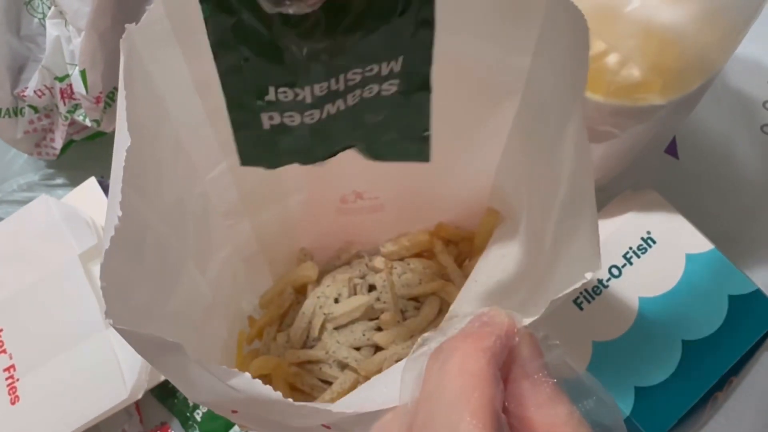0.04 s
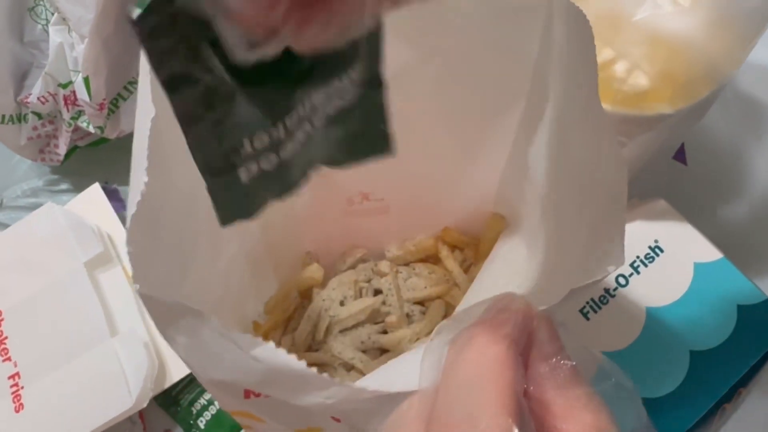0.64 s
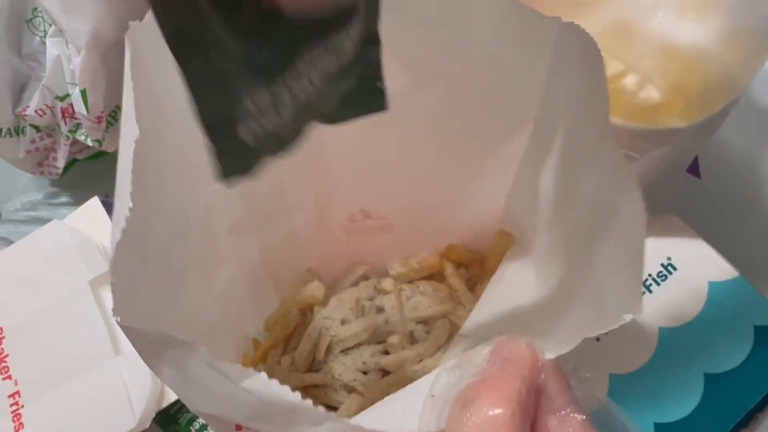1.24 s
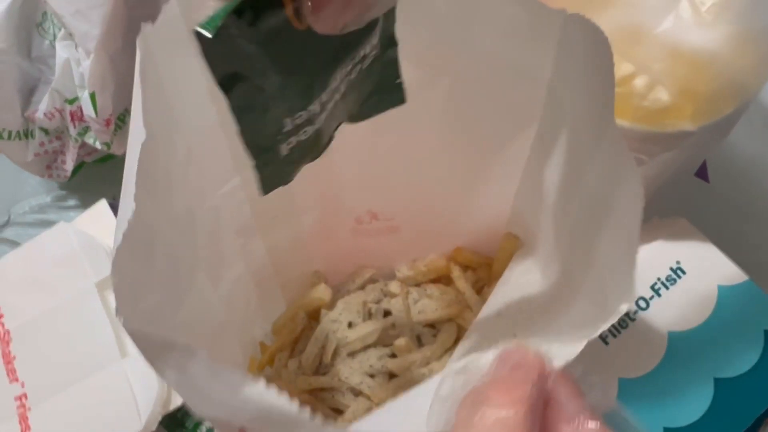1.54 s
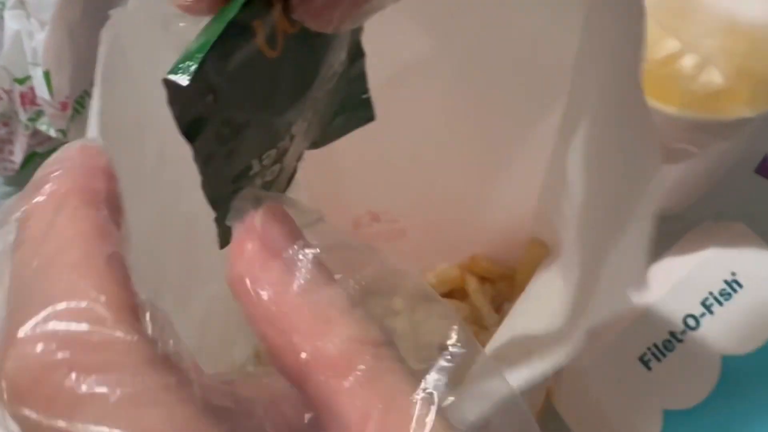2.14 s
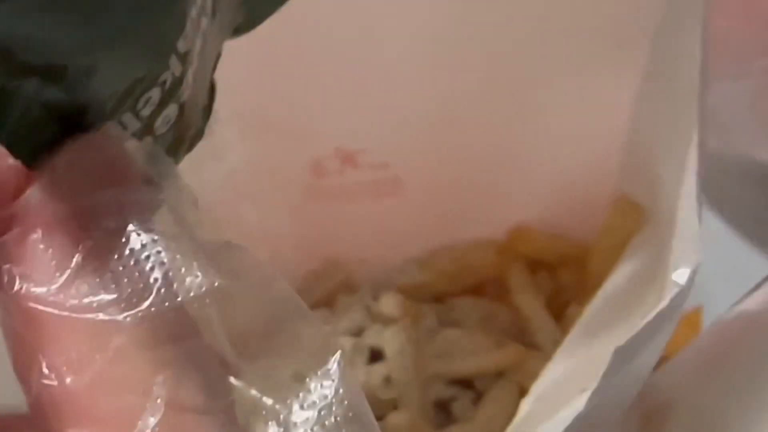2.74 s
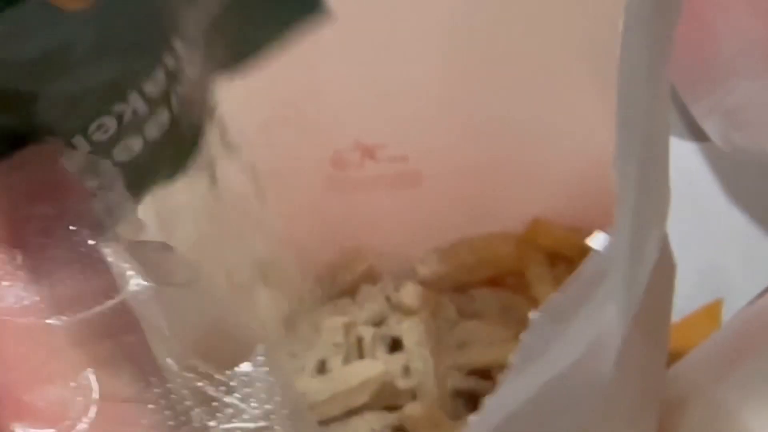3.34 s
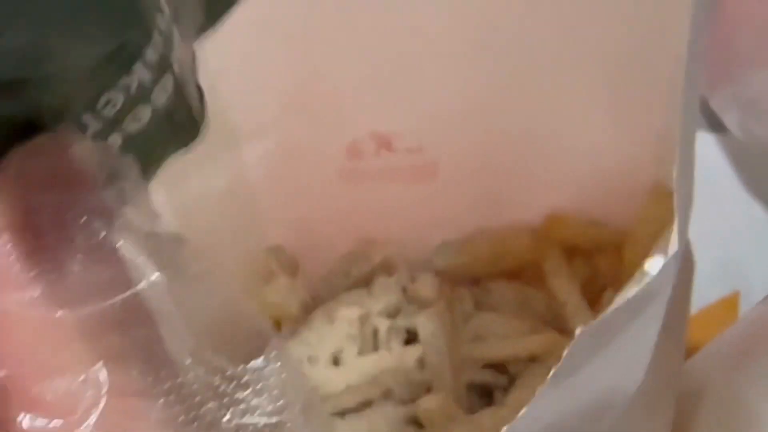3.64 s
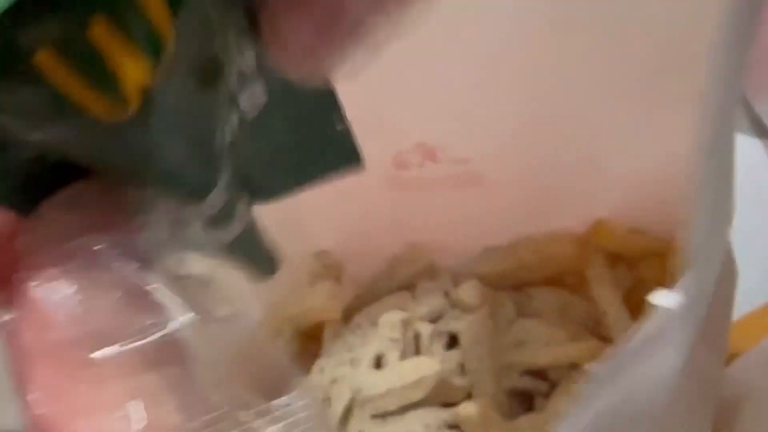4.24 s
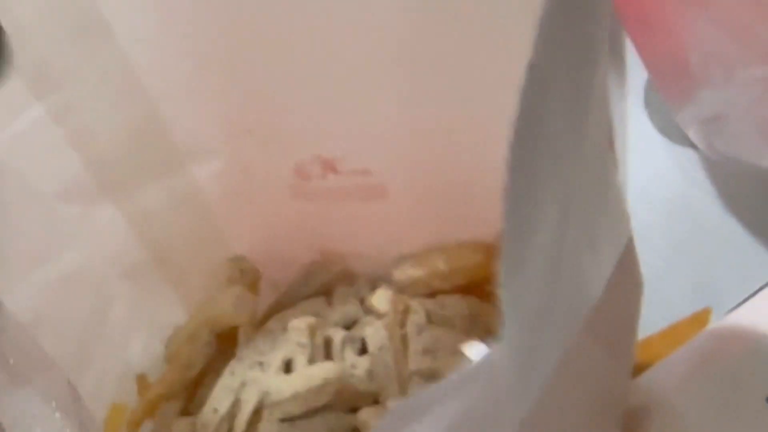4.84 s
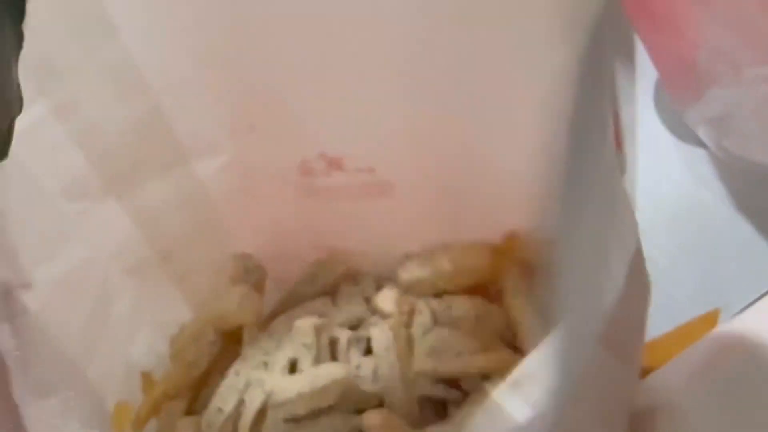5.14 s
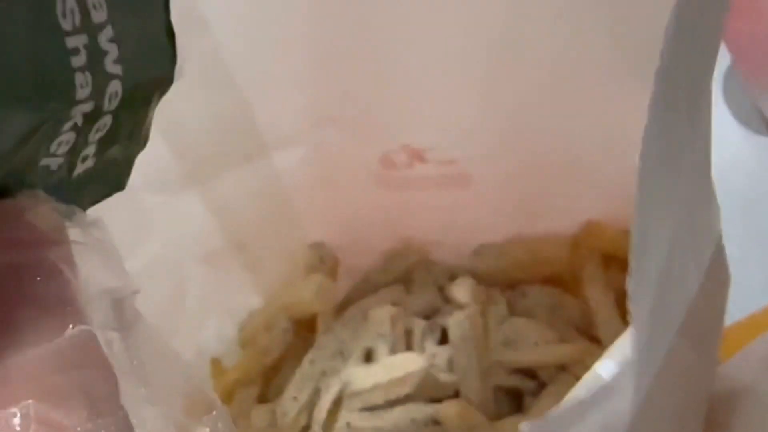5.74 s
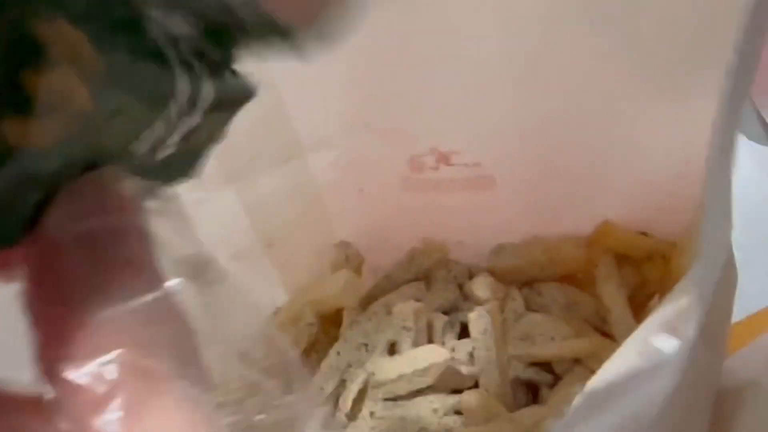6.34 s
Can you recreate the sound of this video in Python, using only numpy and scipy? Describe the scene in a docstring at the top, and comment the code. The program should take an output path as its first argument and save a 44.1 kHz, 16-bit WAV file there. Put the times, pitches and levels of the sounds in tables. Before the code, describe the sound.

A foil seasoning packet is shaken over a paper bag with a soft powdery hiss, then squeezed with sharp, dense crinkling.

```python
"""A small quiet room; a two-port microphone a hand's width from an open paper bag of fries. A foil seasoning
sachet is shaken over the bag: powder sifts down in a fine bright hiss and clumps tick on the paper. Then gloved
fingers grip and squeeze the sachet; its creases snap and tones ring with them. The held bag flexes throughout,
with soft thumps and a low rumble."""
import sys
import numpy as np
from scipy import signal
from scipy.fft import rfft, irfft
from scipy.io import wavfile
from scipy.ndimage import uniform_filter1d

SR = 44100
rng = np.random.default_rng(int(sys.argv[2]) if len(sys.argv) > 2 else 0)


def waveform_to_disk(signal):
    """Save audio, clipped to [-1, 1], as 16-bit WAV at the path in sys.argv[1]."""
    frames = np.transpose(np.atleast_2d(signal))
    scaled = np.clip(frames, -1, 1) * 32767
    samples = np.round(scaled).astype(np.int16)
    wavfile.write(sys.argv[1], SR, samples)


N = 289994
TIME = np.arange(N) / SR
LEAD = 96  # samples in which a crease starts to give before it cracks

# spectrum of crackling foil: f/Hz, level/dB
FOIL_SPECTRUM = [(300, 5), (600, -6), (1000, -6), (1500, -10.5), (2200, -7), (2900, -2), (3450, -1),
                 (3750, -7), (6000, -3), (7700, 0), (9000, -6.5), (10300, -5.5), (12500, -12),
                 (15500, -8.5)]
# shakes that let powder slide out: t/s, length/s, hiss/dB, foil swishing in the fingers/dB
SHAKES = [(0.0, 0.24, -44, -53), (0.13, 0.2, -45.5, -62), (0.34, 0.11, -49.5, -50.5),
          (0.52, 0.16, -54, -56), (0.828, 0.013, -37, -50), (0.93, 0.085, -49, -56),
          (1.09, 0.025, -47.5, -55), (1.23, 0.086, -47.5, -55), (1.44, 0.1, -52.5, -54.5),
          (1.58, 0.14, -41.5, -54), (1.8, 0.098, -40.5, -48), (1.93, 0.15, -46, -47), (2.06, 0.2, -49, -54),
          (2.23, 0.21, -55.5, -50.5), (2.53, 0.035, -50, -44), (2.71, 0.038, -48, -42),
          (2.88, 0.16, -55, -54)]
SHAKE_ATTACK_S, SHAKE_RELEASE_S = 0.018, 0.086
# fingers squeezing the sachet: t/s, length/s, creasing/dB, rubbing/dB
SQUEEZES = [(3.02, 0.12, -30, -59), (3.176, 0.12, -31.5, -46), (3.335, 0.19, -53, -51),
            (3.6, 0.049, -47, -48), (3.711, 0.32, -47, -49), (4.051, 0.21, -28.5, -43.5),
            (4.313, 0.068, -36, -41), (4.41, 0.075, -39, -44), (4.7, 0.027, -35, -68),
            (4.773, 0.12, -35.5, -52.5), (4.944, 0.021, -36, -48), (5.03, 0.088, -30, -50.5),
            (5.114, 0.055, -31, -57), (5.274, 0.03, -29, -42), (5.338, 0.03, -28, -54),
            (5.43, 0.027, -41, -45.5), (5.505, 0.026, -26, -45), (5.923, 0.47, -37.5, -47),
            (6.421, 0.12, -29, -39)]
SQUEEZE_ATTACK_S, SQUEEZE_RELEASE_S = 0.0031, 0.0067


def undb(db):
    """Decibels to gain."""
    return 10 ** (np.asarray(db) / 20)


def unit(x):
    """Scale to rms 1."""
    return x / np.sqrt(np.mean(x ** 2) + 1e-20)


def across(points, hz):
    """Read (f/Hz, value) points on a log-frequency axis."""
    f, value = np.transpose(points)
    return np.interp(np.log(hz + 1), np.log(f), value)


def colour(x, spectrum):
    """Causal filter with the given (f/Hz, level/dB) spectrum, from the folded cepstrum."""
    n = x.shape[-1]
    gain = undb(across(spectrum, np.fft.rfftfreq(n, 1 / SR)))
    cepstrum = irfft(np.log(gain), n)
    cepstrum[1:n // 2] *= 2
    cepstrum[n // 2 + 1:] = 0
    return irfft(rfft(x) * np.exp(rfft(cepstrum)), n)


def band(x, lo_hz, hi_hz):
    """Band-pass."""
    return signal.sosfilt(signal.butter(3, [lo_hz, hi_hz], "band", fs=SR, output="sos"), x)


def resonate(x, hz, width_hz):
    """One ringing mode."""
    return signal.lfilter(*signal.iirpeak(hz, hz / width_hz, fs=SR), x)


def smooth(power, samples):
    """Average a power twice over a sliding window."""
    return np.abs(uniform_filter1d(uniform_filter1d(power, samples), samples))


def wander(per_s):
    """Glide between random values, per_s of them a second; rms 1."""
    hold = int(SR / per_s)
    steps = np.repeat(rng.standard_normal(N // hold + 1), hold)
    return unit(uniform_filter1d(steps, hold)[:N])


def add(track, start_s, sound):
    """Mix a sound into the track."""
    i = max(int(start_s * SR), 0)
    n = max(min(sound.shape[-1], N - i), 0)
    track[..., i:i + n] += sound[..., :n]


def spread(mid, side, side_db):
    """Left and right from mid and side."""
    return mid + undb(side_db) * np.array([side, -side])


def gestures(rows, attack_s, release_s, column=2):
    """Gain over time of movements (t/s, length/s, level/dB, ...): each swells, holds and dies away."""
    t = TIME[::32]
    power = 0
    for start, length, db in np.array(rows)[:, [0, 1, column]]:
        before, after = np.maximum(start - t, 0), np.maximum(t - start - length, 0)
        power += undb(db) ** 2 * np.exp(-2 * (before / attack_s + after / release_s))
    return np.interp(TIME, t, np.sqrt(power))


def patter(per_s, scatter_db, decay_ms):
    """Tiny random impacts of uneven size, as bursts in two noises; loudness evened out over 40 ms."""
    hits = rng.random(N) < per_s / SR
    energy = hits * undb(scatter_db * np.minimum(rng.standard_normal(N), 2.6)) ** 2
    power = signal.lfilter([1], [1, -np.exp(-2e3 / (decay_ms * SR))], energy)
    return np.sqrt(power / (smooth(power, SR // 25) + 1e-9)) * rng.standard_normal((2, N))


def powder(grip, pour_db=3, kneaded_db=-14, trickle_db=-65, flicker_db=2, clump_db=-8, clump_s=0.0021):
    """Fine dust scrapes down the foil in a hiss; coarser granules and clumps tick on the paper."""
    # spectrum of falling grains: f/Hz, level/dB
    grain_spectrum = [(1000, -8.5), (3000, -14.5), (5200, -10), (6300, -10), (7500, -2.5), (9000, 0),
                      (10700, -1.5), (12200, -6.5), (15500, -1)]
    # clumps of seasoning striking the paper: t/s, level/dB
    clumps = [(0.1426, -28), (0.16, -33), (0.8235, -33), (0.8834, -40), (0.9, -37), (0.9314, -29.5),
              (0.9936, -30.5), (1.0903, -28.5), (1.229, -42), (1.305, -31), (1.6673, -34), (1.7027, -29),
              (1.799, -36), (1.8248, -27), (1.8862, -26), (1.9062, -26), (1.914, -29), (2.014, -25),
              (2.5447, -24.5)]
    dust = patter(per_s=3800, scatter_db=4.5, decay_ms=0.78)
    granules = patter(per_s=260, scatter_db=27, decay_ms=0.71)
    mid, side = unit(colour(dust + undb(-2) * granules, grain_spectrum))
    # the paper walls scatter the lower part of the hiss; the top arrives straight
    side = colour(side, [(5000, -4.5), (9000, -9.5), (12000, -20)])
    pour = gestures(SHAKES, SHAKE_ATTACK_S, SHAKE_RELEASE_S)
    flow = undb(pour_db) * pour + undb(kneaded_db) * grip + undb(trickle_db)
    out = spread(mid, side, side_db=0.5) * flow * undb(flicker_db * wander(per_s=60))
    t = TIME[:512]
    for start, db in clumps:
        tick = rng.standard_normal(len(t)) * np.exp(-t / clump_s)
        add(out, start, undb(db + clump_db) * unit(colour(tick, grain_spectrum)))
    return out


def glove(grip, rub_db=-3, grip_rub_db=-15, crinkle_db=-15, swish_db=-5, slip_db=4):
    """Thin plastic swishes on the foil with each shake; under the fingers' grip it rubs and creases."""
    # spectrum of the glove sliding on foil: f/Hz, level/dB
    slide_spectrum = [(300, 4), (600, -4), (1000, 9), (1600, 3.5), (2300, 7.5), (3100, 8), (4500, 5.5),
                      (6000, 1.5), (7700, 2), (10000, -39.5), (15000, 2)]
    slide = unit(colour(patter(per_s=1800, scatter_db=11.5, decay_ms=2.7)[0], slide_spectrum))
    folds = colour(patter(per_s=170, scatter_db=14, decay_ms=0.81)[0], FOIL_SPECTRUM)
    creases = unit(resonances(folds, direct_db=-3))
    sheen = unit(colour(patter(per_s=2800, scatter_db=5.5, decay_ms=1.0)[0], FOIL_SPECTRUM))
    squeeze = gestures(SQUEEZES, SQUEEZE_ATTACK_S, SQUEEZE_RELEASE_S)
    rub = gestures(SQUEEZES, SQUEEZE_ATTACK_S, SQUEEZE_RELEASE_S, column=3)
    shake = gestures(SHAKES, SHAKE_ATTACK_S, SHAKE_RELEASE_S, column=3)
    rubbing = slide * (undb(rub_db) * rub + undb(grip_rub_db) * grip)
    creasing = undb(crinkle_db) * creases * np.hypot(squeeze, grip)
    swishing = undb(swish_db) * (slide + undb(-4) * sheen) * shake
    catch_and_slip = undb(slip_db * wander(per_s=40))
    return (rubbing + creasing) * catch_and_slip + swishing


def bag(sway_db=-2, sway_swell_db=-10, flutter_db=-9, flutter_swell_db=-13, thump_db=-16, slap_db=-11):
    """The limp paper walls pump air at the microphone, and now and then flip with a thump."""
    # the bag swaying in the hand: t/s, level/dB
    sway_levels = [(0.0, -38), (0.03, -37), (0.66, -41), (0.69, -32.5), (1.28, -43.5), (1.85, -38.5),
                   (1.98, -32), (2.05, -44), (2.29, -39.5), (2.34, -29), (2.47, -57), (2.53, -30),
                   (2.65, -56.5), (2.78, -32), (2.91, -47), (3.44, -35.5), (3.5, -44.5), (3.57, -28),
                   (3.7, -37.5), (4.89, -41), (5.0, -56), (5.07, -36), (6.01, -43), (6.58, -36)]
    # a wall flexing: t/s, level/dB, slap relative to that level/dB
    flexes = [(0.336, -32, -8.5), (0.488, -29, -13.5), (0.689, -31.5, -13), (0.74, -29, -11),
              (0.86, -24, -13), (0.915, -27.5, -8), (0.96, -24, -16), (1.069, -30.5, -27),
              (1.269, -36.5, -22), (1.504, -35.5, -11), (1.836, -35.5, -17), (1.904, -23, -10.5),
              (1.925, -22, -9), (1.944, -24.5, -7), (1.975, -22.5, -14.5), (2.317, -29, -5.5),
              (2.342, -31.5, -1.5), (2.502, -29.5, -4.5), (2.572, -28.5, -16), (2.76, -41, -10),
              (3.578, -32.5, -6.5), (3.61, -35, -9), (3.653, -25.5, -15.5), (3.776, -29, -10),
              (3.831, -26, -15), (4.198, -29.5, -10.5), (4.322, -27.5, -15), (4.404, -25.5, -15),
              (4.434, -23.5, -12), (4.594, -28.5, -17), (4.93, -31, -20), (5.125, -28.5, -10),
              (5.154, -28, -5.5), (5.31, -26.5, -24), (5.486, -28, -14.5), (5.718, -28.5, -16),
              (6.12, -36, -18), (6.241, -29.5, -10), (6.411, -36.5, -8), (6.539, -31, -7.5)]
    # spectra of the walls' deep sway, flutter, dull thump and brighter slap: f/Hz, level/dB
    sway_spectrum = [(15, -39), (25, -41), (35, -22.5), (48, -2), (65, -3.5), (90, -4.5), (130, -7.5),
                     (200, -31.5), (400, -57)]
    flutter_spectrum = [(70, -25.5), (150, 3.5), (220, -0.5), (300, -7.5), (420, -13), (650, -24.5),
                        (1500, -65)]
    thump_spectrum = [(20, -30), (45, -5.5), (75, 7.5), (130, 3), (220, 1), (320, -20), (600, -44)]
    slap_spectrum = [(120, -19), (260, 13), (380, 5), (550, -11), (900, -48.5), (2500, -32.5)]
    sway = undb(np.interp(TIME, *np.transpose(sway_levels)))
    # each flex pushes a swell of air, held for 13 ms
    swell = gestures([(start, 0.013, db) for start, db, _ in flexes], attack_s=0.013, release_s=0.02)
    out = np.zeros((2, N))
    for spectrum, steady_db, swell_db in ((sway_spectrum, sway_db, sway_swell_db),
                                          (flutter_spectrum, flutter_db, flutter_swell_db)):
        mid, side = colour(patter(per_s=350, scatter_db=6, decay_ms=5.1), spectrum)
        motion = np.hypot(undb(steady_db) * sway, undb(swell_db) * swell)
        out += spread(unit(mid), unit(side), side_db=-13) * motion
    t = TIME[:8192]
    thump_s, slap_s = 0.015, 0.008
    for start, db, bright_db in flexes:
        noise = rng.standard_normal((2, len(t)))
        thump = unit(colour(noise[0] * np.exp(-t / thump_s), thump_spectrum))
        slap = unit(colour(noise[1] * np.exp(-t / slap_s), slap_spectrum))
        add(out, start, undb(db + thump_db) * thump + undb(db + bright_db + slap_db) * slap)
    return out


def room_tone(level_db=-47.5):
    """Still room air, a faint low rush behind the close sounds."""
    # spectrum of the quiet room: f/Hz, level/dB
    air_spectrum = [(20, -13), (62, 2.5), (120, -9), (300, -14), (700, -24.5), (930, -20.5), (1300, -28.5),
                    (2500, -36.5), (7000, -58), (15000, -53)]
    mid, side = unit(colour(rng.standard_normal((2, N)), air_spectrum))
    return spread(mid, side, side_db=-4) * undb(level_db)


def snap(body_db, treble_db, ring_hz, rise_ms=0.31, shiver_ms=2.4, ring_db=-2):
    """A crease buckles: it starts to give, cracks, then the foil shivers and the freed facet rings."""
    ms = (np.arange(1024) - LEAD) / SR * 1000
    noise = rng.standard_normal((3, len(ms)))
    noise[:, LEAD] = 3.16 * np.sign(noise[:, LEAD])  # the crack
    # a heavy fold shivers longer, a bright crack is shorter
    decay_ms = shiver_ms * 2 ** (body_db / 20 - max(treble_db, 0) / 17)
    linger = np.array([[1.54], [1], [1]])  # low bending waves die last
    envelope = np.exp(np.minimum(ms / rise_ms, -ms / (decay_ms * linger)))
    body, middle, treble = colour(noise * envelope, FOIL_SPECTRUM)
    ring = unit(resonate(middle, ring_hz, width_hz=350))
    body = unit(band(body, 377, 2030))
    middle = unit(unit(band(middle, 2030, 5080)) + undb(ring_db) * ring)
    treble = unit(band(treble, 6770, 19700))
    return middle + undb(body_db) * body + undb(treble_db) * treble


def sachet(snap_db=-7.5, crackle_db=-17.5, crackle_s=0.009):
    """The foil's large snaps, each amid small wrinkles that give way with it."""
    # creases snapping, and at 0.863, 1.8455 and 2.0135 s the glove ticking on the foil as it shakes: t/s, mid-
    # band level/dB, body re mid/dB, treble re mid/dB, facet ring f/Hz
    creases = [(0.2168, -37.5, -8, -8, 3980), (0.2855, -44, 6.5, 23, 3670), (0.3013, -39.5, -0.5, 6, 4350),
               (0.4253, -45, -1.5, 2, 3570), (0.6758, -50, -10, 16, 3600), (0.84, -43, -1, 13, 3940),
               (0.863, -42, -12, 5, 3430), (1.8455, -44, 0, 4, 3400), (2.0135, -45, -1, 1, 3400),
               (2.869, -50.5, 3, 16, 3200), (3.0693, -40, -10, 1, 3300), (3.1049, -28, -3.5, 0, 3820),
               (3.1116, -38.5, 1, 12, 3500), (3.1167, -34, 0.5, 6.5, 3980), (3.1232, -33, 2.5, 4, 3530),
               (3.1335, -30.5, -15, 2, 2540), (3.1902, -33.5, -4, -8, 3400),
               (3.2106, -22.5, -27, -0.5, 3240), (3.225, -30.5, -3, -2, 2800),
               (3.259, -36.5, 4.5, 14, 5000), (3.2652, -26.5, -2.5, 1.5, 2840),
               (3.2871, -30, -1.5, 1, 3900), (3.3385, -29, -8.5, 4.5, 4100), (3.3912, -38, 5.5, -4, 3340),
               (3.4337, -39.5, -2, 3.5, 2780), (3.489, -27.5, -17, 4, 2900), (3.4943, -32, -4.5, 4, 3020),
               (3.5135, -33.5, -8, -1, 4000), (3.5813, -23, -16, 4.5, 2820), (3.7309, -34.5, 0.5, -2, 2870),
               (3.7492, -27.5, -20, -3, 2930), (3.7832, -34, -18, -5, 3730), (3.8066, -29, -7, 5, 2880),
               (3.8162, -20.5, -17, 0, 2870), (3.8579, -30.5, -12, -15, 3460), (3.872, -37.5, 5, -5, 3320),
               (3.881, -34.5, 4, 5, 3300), (3.9352, -21, -13, 0.5, 4700), (3.949, -24, -6.5, 10, 3250),
               (3.9637, -28.5, -23, -7, 3380), (3.9735, -30, -8, -1, 3100), (4.009, -36, -5, -5, 2920),
               (4.0823, -33, -8, -15, 2950), (4.0923, -27.5, -8.5, 0, 2970), (4.104, -23, -19, -1, 3250),
               (4.1164, -23.5, -18, 5, 3060), (4.1251, -23.5, -29, -3, 2880),
               (4.1443, -33.5, -2.5, 2, 2620), (4.1845, -29, -9, 2, 2840), (4.1952, -29, -24, 0, 2800),
               (4.2037, -18, -16, 0, 2840), (4.2157, -26.5, -20, 2, 2900), (4.2377, -23.5, -8, 6, 3250),
               (4.2532, -32, -14, -2, 4100), (4.324, -29, -8, -5, 2980), (4.3293, -23, -8.5, 0, 2960),
               (4.3426, -20, -15.5, 0.5, 3370), (4.3564, -33.5, -6, 6, 2200),
               (4.4393, -32.5, -18, 1.5, 2940), (4.4661, -32, -33, -7, 3020),
               (4.5302, -37.5, -7.5, -20, 3500), (4.702, -31, -16, 6.5, 2940), (4.7937, -39, -3, 10, 4900),
               (4.8005, -32, -7, 11, 4000), (4.9523, -30.5, -25, -4, 3360), (4.962, -32.5, -10, 9.5, 4260),
               (4.9708, -41.5, -5, 6, 2700), (5.0225, -40.5, -9, 6, 3300), (5.0567, -32, -4.5, 4.5, 3260),
               (5.1159, -25, -6, 5, 3470), (5.18, -27.5, -8.5, 8, 3740), (5.279, -39, -13, 7, 3400),
               (5.2885, -24.5, -1.5, 4, 3700), (5.3473, -29.5, -0.5, 8, 3250), (5.43, -28, -3, -3, 2600),
               (5.434, -28.5, 2, 5.5, 3640), (5.437, -40.5, -9, 17, 4000), (5.5228, -26.5, -2, 4, 3300),
               (5.539, -26, -17, -7, 3500), (5.6177, -23.5, -7.5, -5.5, 3530), (5.8584, -37, -9, 2, 3660),
               (5.9473, -36, -17, -4.5, 3020), (5.9713, -35.5, -4, 5, 2070), (6.008, -25.5, -22, 0, 3500),
               (6.0246, -27.5, -9, 0, 2730), (6.0332, -36, 1.5, 14, 3100), (6.0659, -32.5, -3, 0, 2820),
               (6.083, -26, -7.5, 6.5, 3330), (6.1053, -29.5, -10, 6.5, 2800), (6.1283, -29, -22, -4, 3320),
               (6.133, -22, -11, -0.5, 3100), (6.1395, -32, -10, 9.5, 3400), (6.146, -32.5, -2.5, -1, 3300),
               (6.1572, -35, 4, -8, 3100), (6.1976, -29.5, -35, -5, 3300), (6.2181, -34.5, -10, 6, 3600),
               (6.2288, -34, -14, 6, 2110), (6.2353, -30, -2, 8, 3240), (6.2424, -28.5, -4, 9.5, 2200),
               (6.275, -36, -20, -12, 3500), (6.292, -28.5, -5, 8, 3100), (6.2993, -28.5, -6.5, 11, 3640),
               (6.3242, -30, -6, 10, 3060), (6.346, -31, -10, -3, 2170), (6.3568, -31.5, -3, 4.5, 3400),
               (6.416, -37, -21, -4, 2840), (6.4357, -36, -5, 2, 4040), (6.4455, -30, -5, 6, 2865),
               (6.4763, -31.5, 0.5, 5, 3840), (6.5136, -37, 3, 3, 3320), (6.5303, -32.5, -9, 12, 3270),
               (6.5356, -27, -21, 6.5, 3360), (6.541, -33, -19, 8, 5000), (6.5646, -24, -8.5, 2.5, 3370)]
    snaps = np.zeros(N)
    for start, db, body_db, treble_db, ring_hz in creases:
        add(snaps, start - LEAD / SR, undb(db + snap_db) * snap(body_db, treble_db, ring_hz))
    strain = np.sqrt(smooth(snaps ** 2, int(crackle_s * SR)))
    wrinkles = unit(colour(patter(per_s=500, scatter_db=9.5, decay_ms=0.53)[0], FOIL_SPECTRUM))
    return snaps + undb(crackle_db) * strain * wrinkles


def resonances(crackle, direct_db):
    """Whatever crackles in the foil also sets off a set of ringing resonances."""
    # resonances that ring along with the foil: f/Hz, width/Hz, level/dB
    modes = [(660, 39, -5), (985, 120, -12.5), (1540, 210, -1), (1865, 68, -1), (2820, 59, -10),
             (3080, 37, -22), (3487, 160, -13.5), (3960, 160, -4.5), (5190, 160, -8)]
    rings = sum(undb(db) * resonate(crackle, hz, width_hz) for hz, width_hz, db in modes)
    return undb(direct_db) * crackle + rings


def reflections(x, wet_db, t60_s, delay_s, top_hz):
    """Diffuse reflections, unrelated at the microphone's two ports."""
    t = TIME[:SR // 2]
    noise = band(rng.standard_normal((2, len(t))), 270, top_hz)
    tail = noise * undb(-60 * t / t60_s) * (t > delay_s)
    tail /= np.sqrt(np.sum(tail ** 2, axis=1, keepdims=True))
    return undb(wet_db) * signal.fftconvolve(x[None], tail, axes=1)[:, :N]


def scene():
    """Powder, glove, bag and sachet at a hand's width; the snaps reflect in the bag and the room."""
    # the glove holding on between squeezes: t/s, length/s, level/dB
    grips = [(3.0, 0.55, -41.5), (3.74, 0.68, -42.5), (4.52, 0.15, -41), (4.72, 0.1, -39.5),
             (5.0, 0.68, -40), (5.95, 0.71, -46)]
    grip = gestures(grips, attack_s=0.041, release_s=0.096)
    foil = resonances(sachet(), direct_db=-2.5)
    in_bag = reflections(foil, wet_db=-20.5, t60_s=0.018, delay_s=0.0015, top_hz=12500)
    in_room = reflections(foil, wet_db=-25.5, t60_s=0.081, delay_s=0.011, top_hz=7600)
    # each crease lies at a different spot between the ports
    direct = spread(foil, foil * wander(per_s=97), side_db=-20)
    return direct + in_bag + in_room + room_tone() + powder(grip) + glove(grip) + bag()


def record(dry, low_cut_hz=30, top_hz=15800):
    """The microphone's two ports differ in phase and gain; the deepest bass and the top are cut."""
    # lead of the left port over the right: f/Hz, phase/rad
    port_phase = [(600, 0), (860, .45), (1500, -.1), (3200, .5), (6000, 0), (7100, .9), (7950, 3.0),
                  (8600, 3.1), (9300, 1.3), (11200, .15), (13200, -.2), (16000, -2.4)]
    # left port minus right port: f/Hz, level/dB
    port_gain = [(120, 0), (300, .8), (650, 2.5), (1100, 1.6), (1900, -.3), (4000, .2)]
    hz = np.fft.rfftfreq(N, 1 / SR)
    half = np.array([[.5], [-.5]])
    ports = np.exp(1j * half * across(port_phase, hz)) * undb(half * across(port_gain, hz))
    heard = irfft(rfft(dry) * ports, N)
    heard = signal.sosfilt(signal.butter(3, low_cut_hz, "high", fs=SR, output="sos"), heard)
    return signal.sosfilt(signal.ellip(10, .2, 70, top_hz, fs=SR, output="sos"), heard)


dry = scene()
out = record(dry)
waveform_to_disk(out)
```